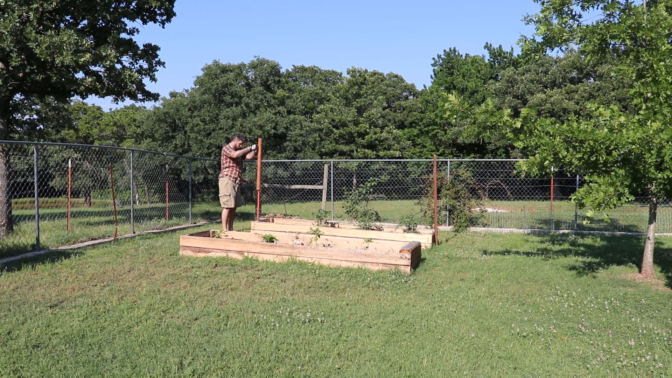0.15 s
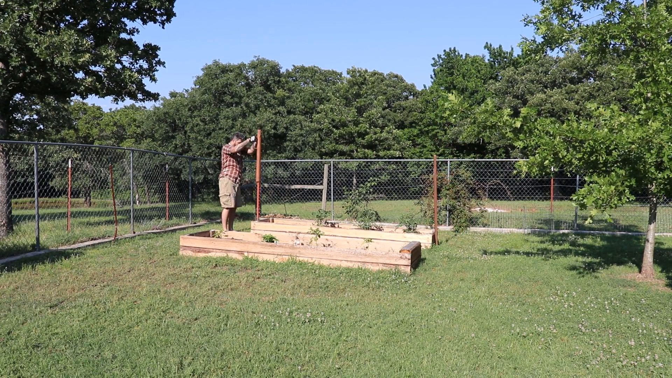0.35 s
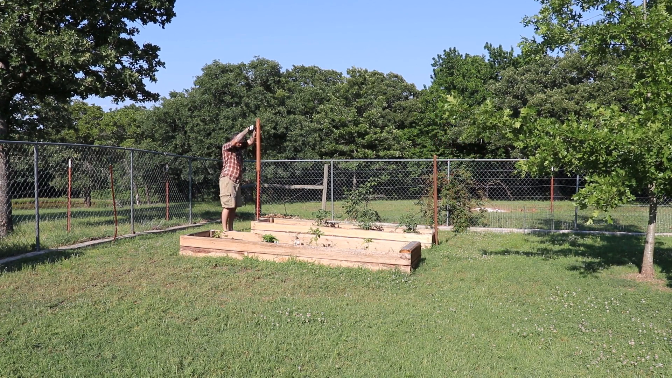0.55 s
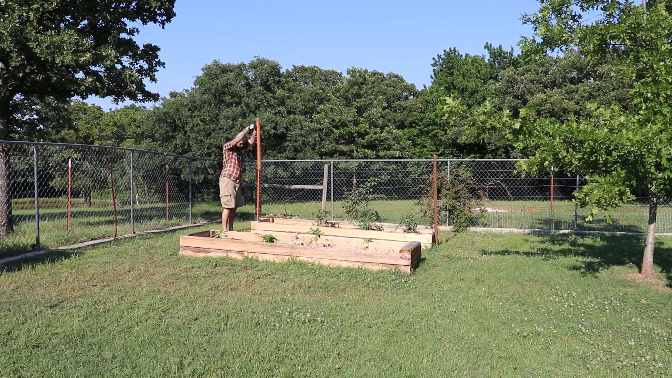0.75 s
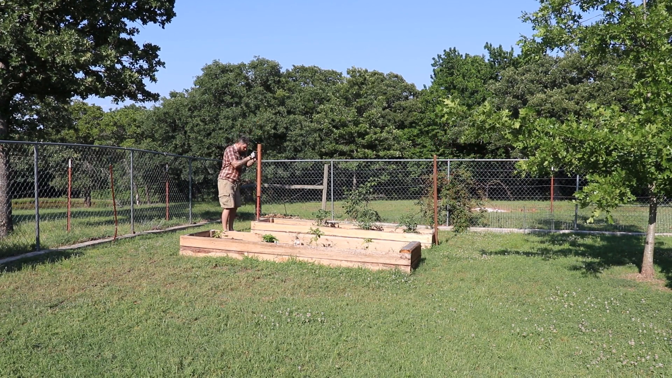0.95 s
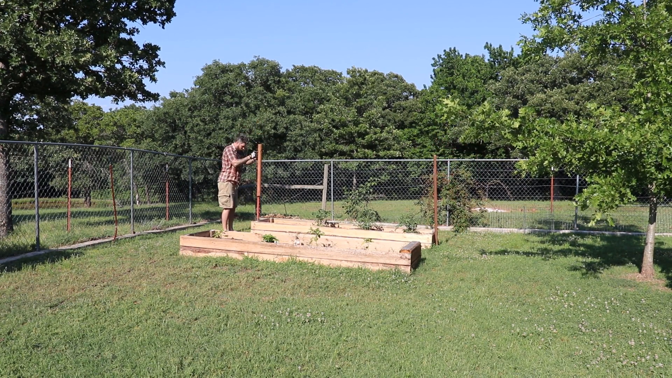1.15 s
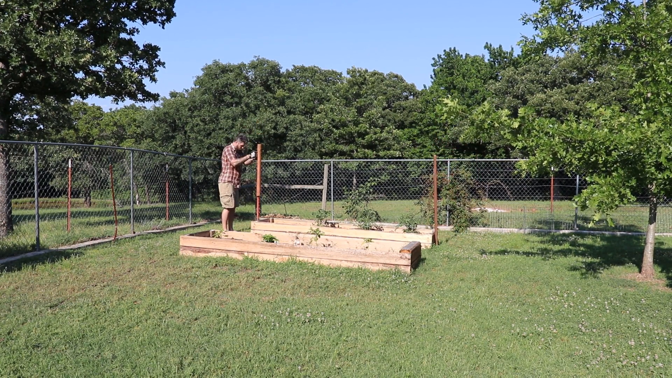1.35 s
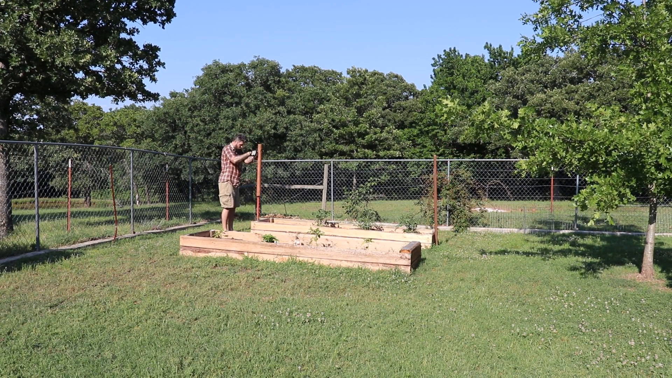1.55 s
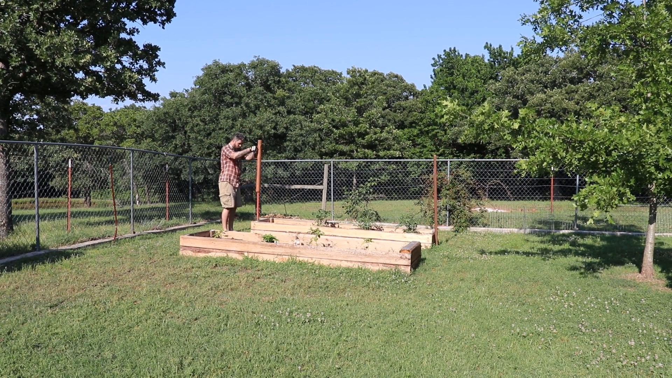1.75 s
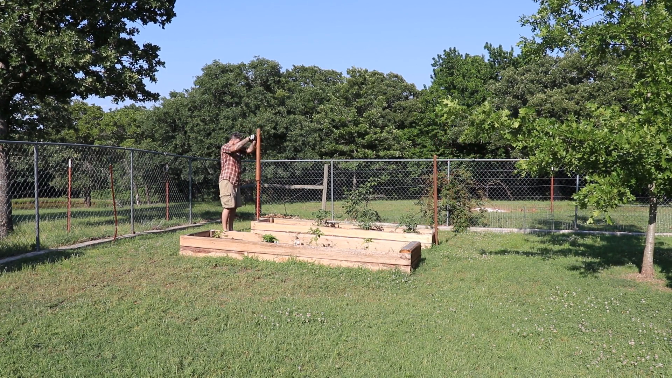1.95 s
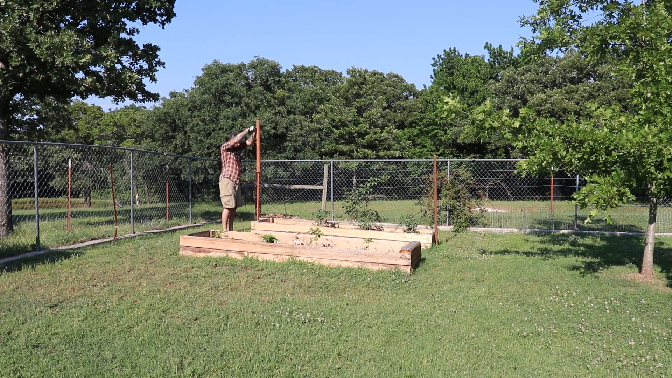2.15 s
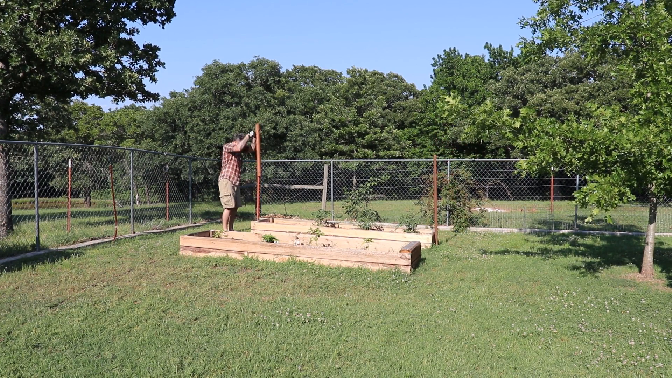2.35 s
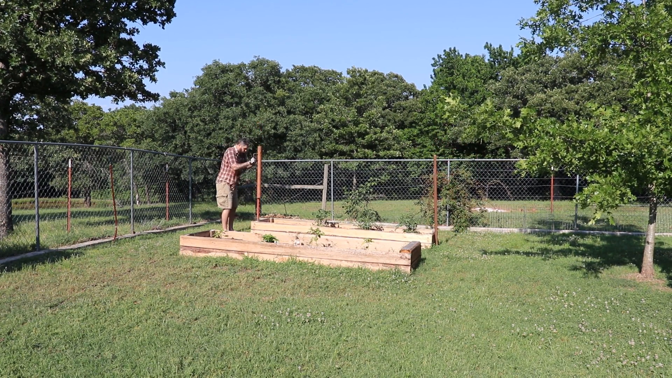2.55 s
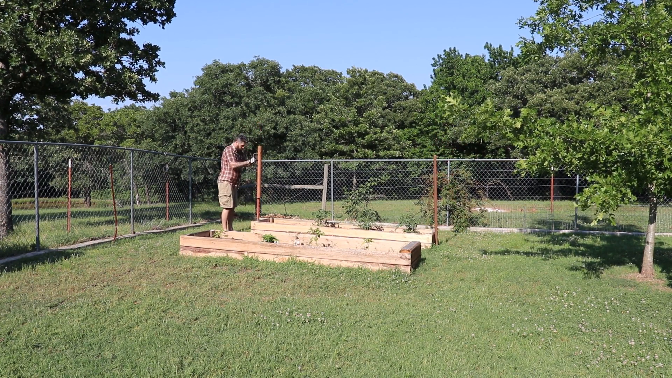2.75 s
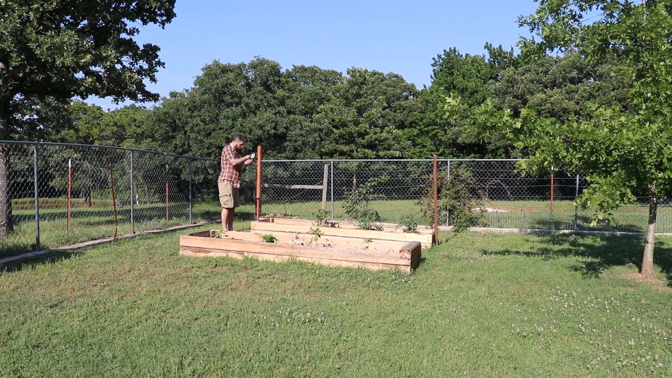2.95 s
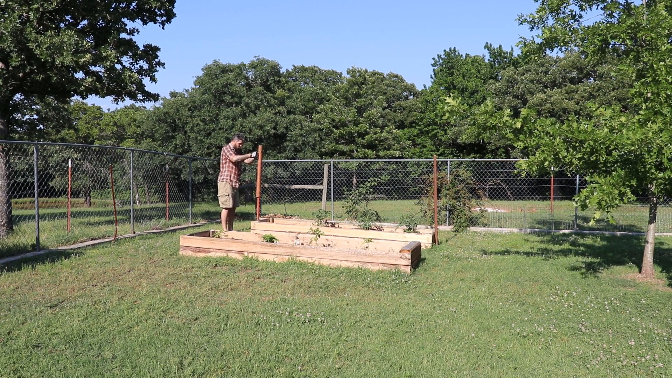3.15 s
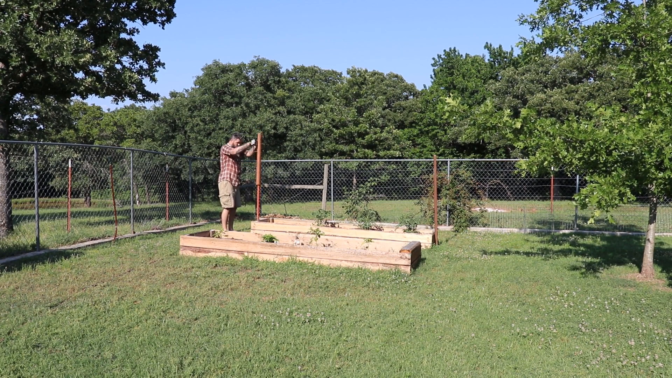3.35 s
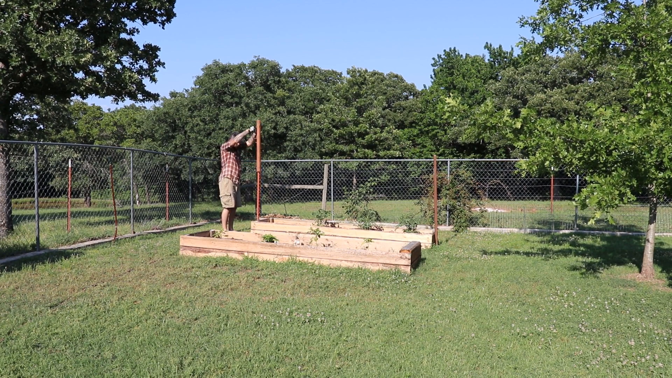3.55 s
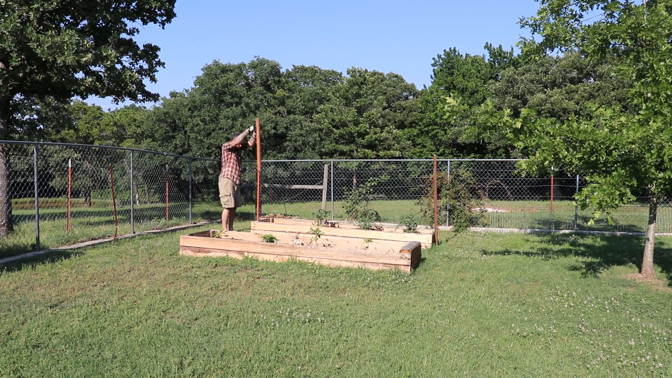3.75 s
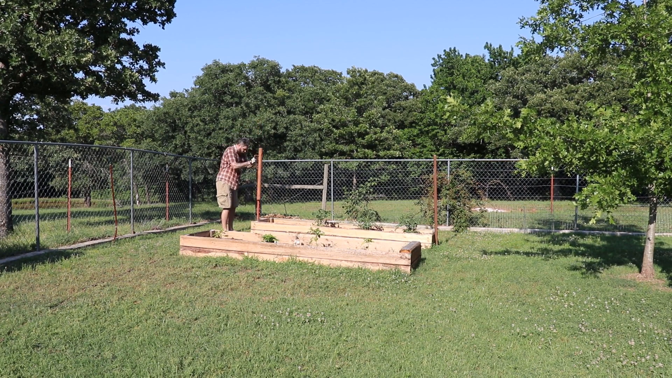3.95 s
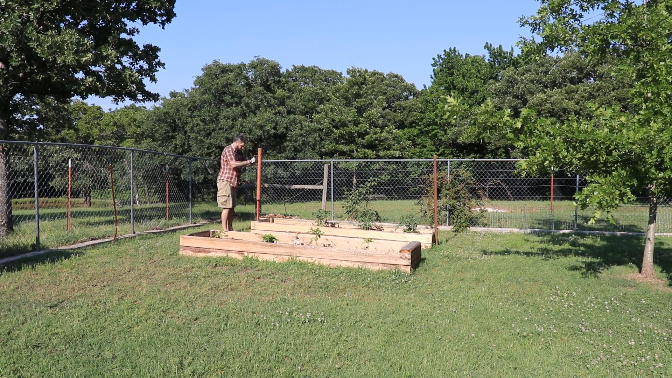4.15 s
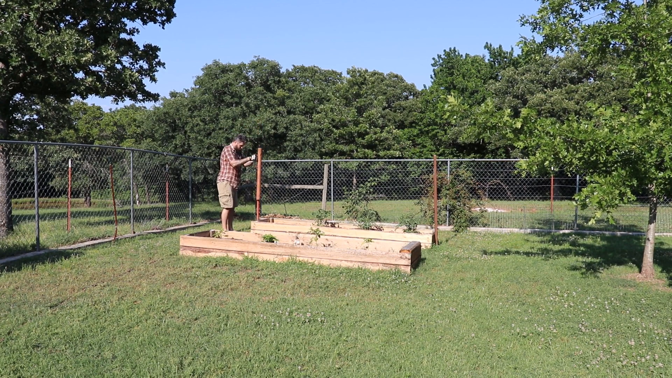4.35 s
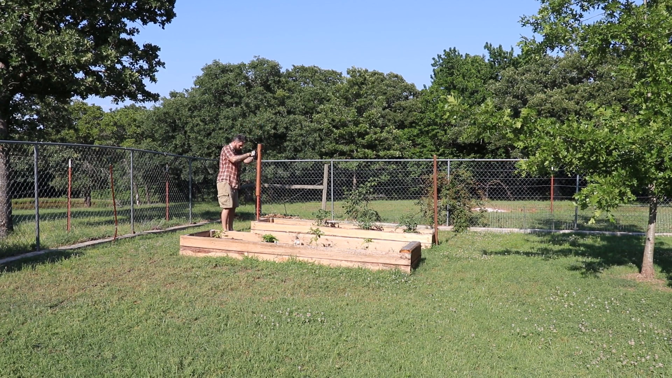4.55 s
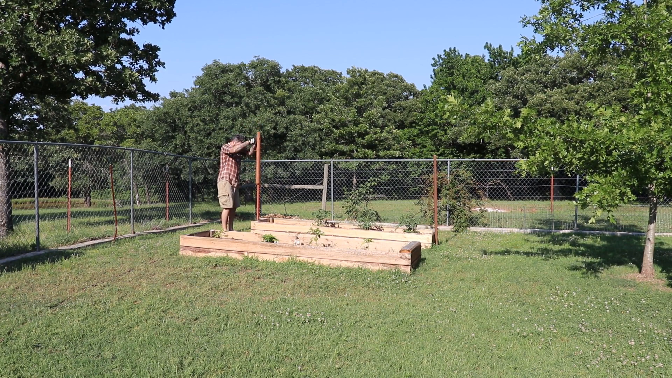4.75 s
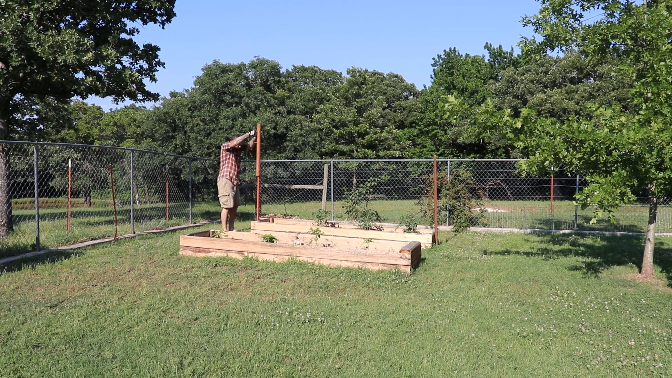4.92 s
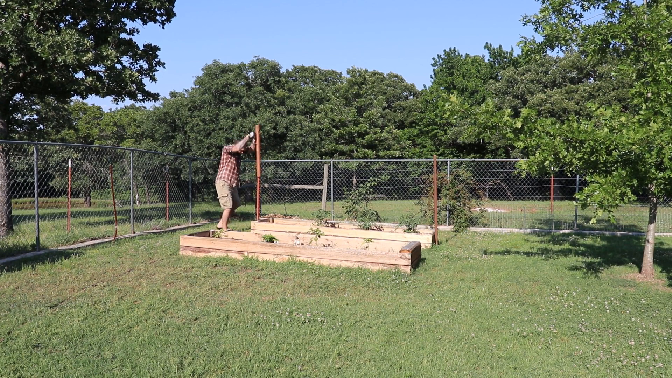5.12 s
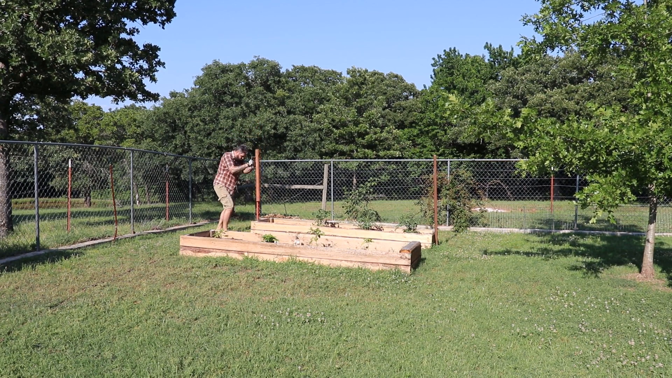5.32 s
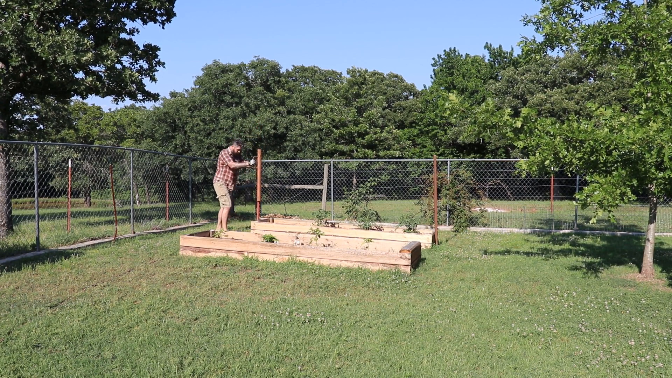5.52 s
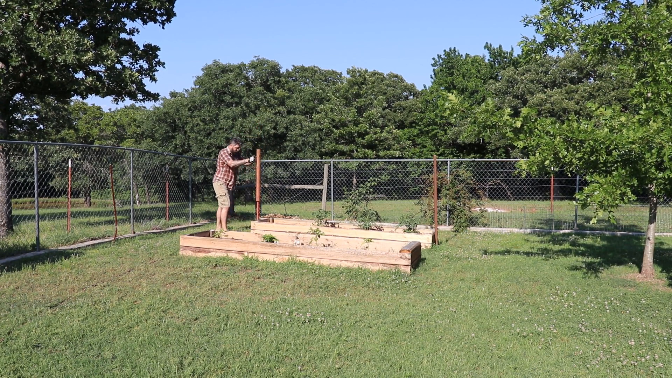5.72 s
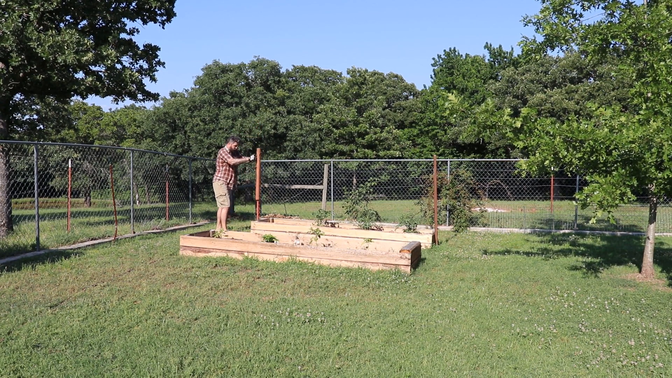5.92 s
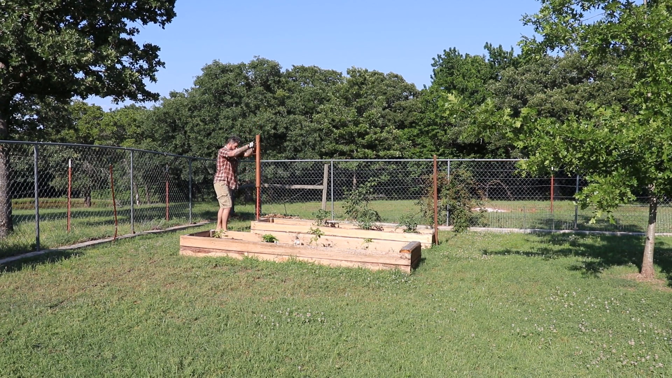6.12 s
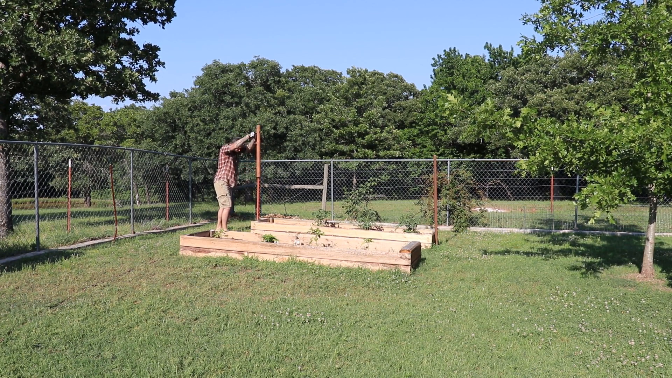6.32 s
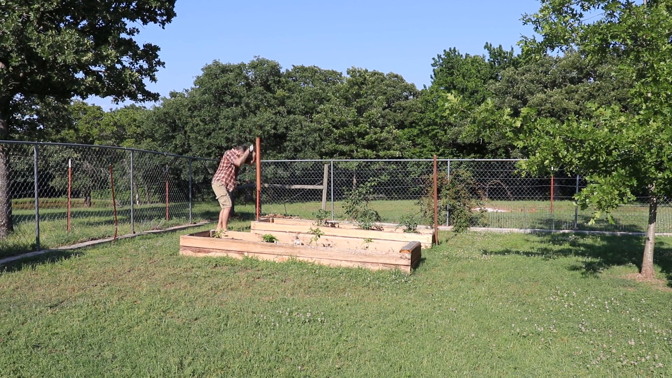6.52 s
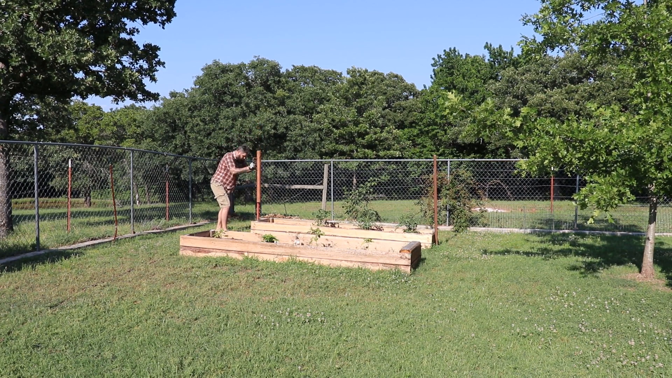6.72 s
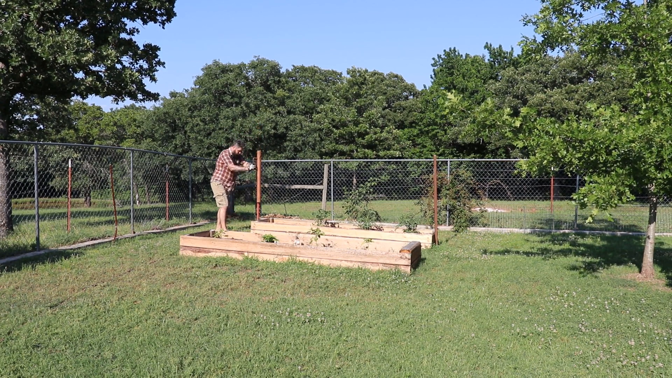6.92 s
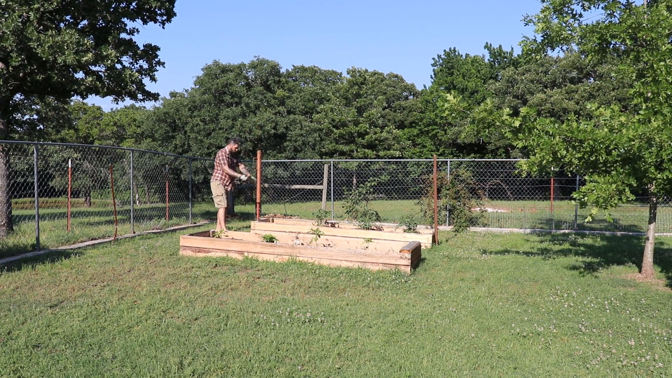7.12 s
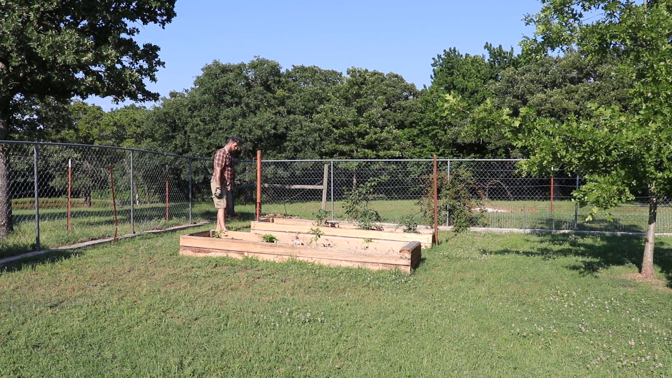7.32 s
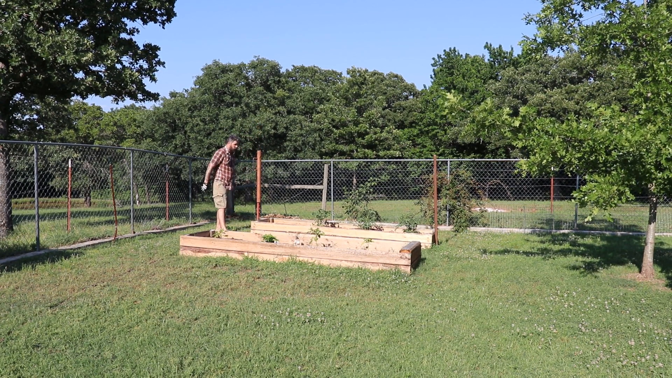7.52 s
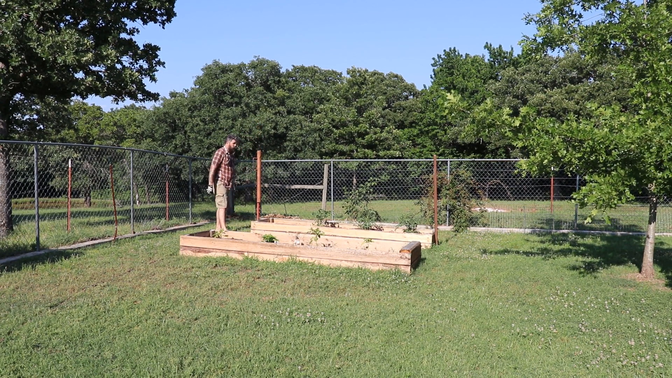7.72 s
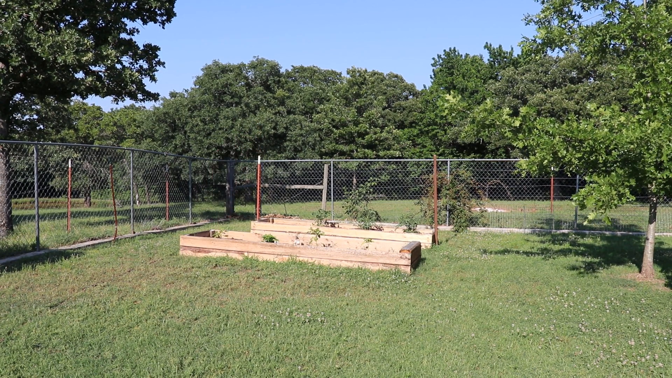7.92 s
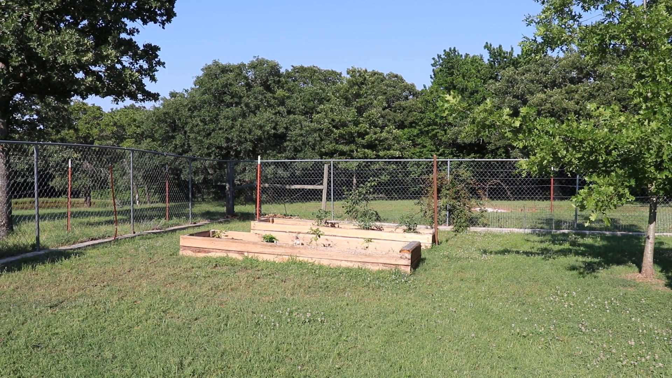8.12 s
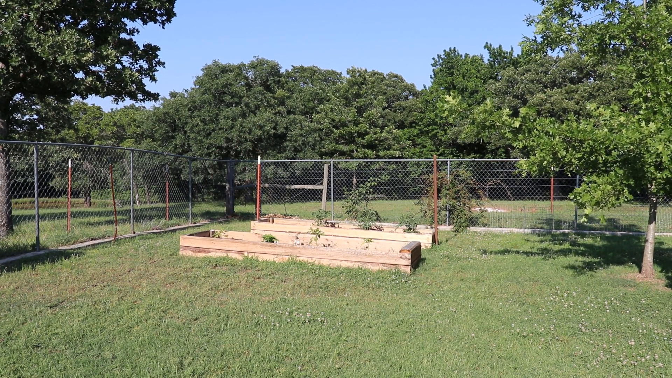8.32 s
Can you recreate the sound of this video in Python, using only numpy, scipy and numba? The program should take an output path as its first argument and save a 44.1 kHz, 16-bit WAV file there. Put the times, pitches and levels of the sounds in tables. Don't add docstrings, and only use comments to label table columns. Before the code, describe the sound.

A hollow steel tube scrapes up a metal fence post and slams down five times, clanging with tree echoes over wind and faint crickets.

```python
import sys
import numpy as np
from scipy import signal
from scipy.fft import rfft, irfft, next_fast_len
from scipy.io import wavfile
from scipy.ndimage import uniform_filter1d
from numba import njit

SR = 44100
rng = np.random.default_rng(int(sys.argv[2]) if len(sys.argv) > 2 else 0)


def wrap_up_sound(samples):
    columns = np.atleast_2d(samples).T
    tamed = np.clip(columns, -1, 1)
    steps = np.round(tamed * 32767).astype(np.int16)
    wavfile.write(sys.argv[1], SR, steps)


def volts_from_db(level):
    exponent = np.asarray(level, float) / 20
    return 10 ** exponent


N = 373518

SCENE_CHANGE_S = 7.942
BAND_EDGES_HZ = 75 * 2 ** np.arange(0, 8.1, .5)
BAND_CENTRES_HZ = np.sqrt(BAND_EDGES_HZ[:-1] * BAND_EDGES_HZ[1:])

# t/s, level/dB
GUSTS = [(0.0, -42), (0.6, -43.5), (1.0, -52), (1.58, -42), (2.05, -33.5), (2.4, -42), (2.75, -47),
         (3.0, -49.5), (3.45, -51), (3.56, -34.5), (3.75, -34.5), (4.0, -44), (4.7, -42.5), (5.0, -38.5),
         (5.6, -43), (6.1, -45), (7.7, -50.5), (8.47, -47)]
# f/Hz, density/dB
WIND_SPECTRUM = [(11, -26), (18, 7), (69, -5), (134, -14.5), (166, -21), (356, -36), (400, -35.5),
                 (520, -64.5), (880, -120)]
# f/Hz, density/dB
AIR_SPECTRUM = [(88, -41), (150, -5), (231, -8.5), (484, -10), (534, -14), (637, -8), (821, -13.5),
                (941, -13), (16000, -30)]
AIR_DB = -55.5
# t/s, length/s, level/dB
CHIRPS = [(0.128, 0.061, -52), (1.87, 0.061, -65), (3.71, .06, -66), (5.805, 0.019, -57), (6.35, .06, -66),
          (7.75, 0.0764, -58), (8.07, .055, -53.5)]

# first catch t/s, sliding free t/s, fastest t/s, top t/s, rub at fastest/dB
LIFTS = [
    (0.225, 0.345, 0.58, 0.88, -43.5),
    (1.685, 1.917, 2.06, 2.35, -40.5),
    (3.215, 3.41, 3.66, 3.6, -41),
    (4.495, 4.695, 4.85, 5.2, -40.5),
    (5.985, 5.99, 6.21, 6.14, -34.5),
]
CREEP_DB, LET_GO_DB, HALF_SLOWED_DB, STOPPED_DB = -55, -2.5, -17, -90
# start t/s, rub at start/dB, rub at blow/dB, tilt/(dB/octave)
DROPS = [
    (0.868, -28, -24, 2.5),
    (2.376, -28, -31, 1),
    (3.834, -28, -30.5, 1),
    (5.174, -33, -16, 3.5),
    (6.518, -23.5, -28, 4),
]
DROP_RISE_S, DROP_CLEAR_S = .008, .0061
# t/s, peak/dB, tilt/(dB/octave), low ring/dB, middle ring/dB
LOOSE_KNOCKS = [(0.214, -15.5, -4.5, -31.5, -32.5), (0.308, -26, -6, -37.5, -30.5),
                (0.358, -33, -11.5, -61.5, -50), (0.596, -44.5, 7.5, -26.5, -39),
                (1.676, -21, -6, -25, -36), (1.707, -18.5, -4.5, -37.5, -34.5),
                (1.909, -35, -14, -45, -37.5), (1.946, -30, -7, -30, -28), (3.204, -8.5, 2.5, -27, -36),
                (3.313, -26, -4, -40.5, -27.5), (3.357, -28, 4, -34.5, -48), (3.428, -42.5, 9, -31, -27.5),
                (3.575, -32, -15, -35, -21.5), (4.482, -18.5, -6.5, -41, -68),
                (4.564, -29.5, -6.5, -70, -75), (4.608, -33, -7, -39, -40), (4.738, -21, 1, -32.5, -36.5),
                (4.808, -112, 46, -33.5, -38), (5.578, -21.5, -3.5, -37, -46),
                (5.765, -18.5, -2.5, -79.5, -48), (5.905, -32.5, -6, -36.5, -40),
                (5.978, -8.5, -0.5, -28, -49), (6.24, -22.5, -1, -31, -34.5), (7.319, -22, -2, -37, -51)]
# t/s, peak/dB, tilt/(dB/octave), low ring/dB, middle ring/dB
DROP_KNOCKS = [(0.826, -31.5, 6.5, -46, -40.5), (0.863, -21.5, -3, -28, -32),
               (0.895, -18.5, 2, -31.5, -33.5), (0.946, -29, 11, -21, -33.5), (2.378, -23, -4, -48.5, -47),
               (2.463, -3.5, 3, -41, -15), (2.485, -8.5, 11, -30, -30), (3.846, -26, -7.5, -34.5, -31),
               (3.894, -5.5, -0.5, -25.5, -25.5), (3.952, -8, 5, -26, -25), (5.177, -6, 0, -39, -21),
               (5.246, -10, 0.5, -22.5, -23.5), (6.394, -35.5, -14, -29.5, -59.5), (6.47, -26, 3, -43, -46),
               (6.522, -27.5, -19, -39, -26.5)]
# t/s, peak/dB, echo/dB, low ring/dB, middle ring/dB
BLOWS = [
    (0.97, 1, -11.5, -27, -5.5),
    (2.494, 0.6, -8.5, -22, -10),
    (3.971, 1, -9, -44, -4.5),
    (5.283, 1.4, -8, -27, -3),
    (6.61, -0.5, -6, -40, -1),
]
# t/s, peak/dB
REBOUNDS = [
    (0.988, -2.5),
    (2.508, -8),
    (3.987, -26.5),
    (5.295, -20.5),
    (6.626, -22),
]
# from t/s, to t/s, pressure/(0-1)
SEATED = [
    (0.868, 1.67, 0.49),
    (2.367, 3.195, 0.41),
    (3.824, 4.473, 0.5),
    (5.205, 5.57, 0.48),
    (6.541, 7.273, 0.41),
]

# f/Hz, density/dB
RUB_SPECTRUM = [(150, -26.5), (420, -12.5), (700, -16), (1700, -6.5), (3000, -14), (4300, -10),
                (6200, -41.5), (7500, -16.5), (9600, -30), (12000, -44), (16000, -49.5)]
# f/Hz, density/dB
SLAM_SPECTRUM = [(47, -49), (80, -21), (768, -5), (1950, 3.5), (2970, -7.5), (3790, 3.5), (6030, -10.5),
                 (7360, -1.5), (10700, -14), (14000, -19), (16500, -24)]
KNOCK_T60_S, SLAM_T60_S = .09, .055
CHATTER_DB, CHATTER_T60_S = -24, .27
LIFT_TILT, CHATTER_TILT = 1.77, -5
LIFT_DRIVE_DB, DROP_DRIVE_DB, CHATTER_DRIVE_DB = 2, -5, -2
# loose/dB, pressed on/dB
LUMPS_DB = (2.0, 2.5)
MODE_LUCK_DB, MODE_WANDER_DB = 3.5, 3.0

# f/Hz, level/dB, t60/s
POST_MODES = [(406, -12, 0.17), (645, -21.5, 0.031), (912.5, -10, 0.11), (1171.4, -1.5, 0.21),
              (1208, -5.5, 0.24), (1527, -8.5, 0.08), (1716, -3.5, 0.08), (1956, -10.5, 0.26),
              (2009, -4, 0.21), (2080, -6, 0.12), (2340, -10, 0.11), (2429, -4, 0.097), (2853, -10.5, 0.16),
              (3195, -23, 0.12), (4066, 1, 0.054), (4410, -6.5, 0.09), (4756, -8, 0.088),
              (5310, -28.5, 0.92), (5740, -20, 0.1), (8900, -31, 0.14)]
# f/Hz, level/dB, t60/s
TUBE_RINGS = [
    [(1340, 0, 2.2), (1395, -11, .5), (1420, -14, .4)],
    [(3822, 0, .9), (3774, -14, .7), (3881, -14, .7)],
    [(7181, -1, .4), (7222, -8, .3), (7245, -7, .3), (7340, -9, .3), (11582, -13, .25), (11713, -11, .25)],
]
CONTACT_LOSS = (4.2, 2.1, 5.6, 0.77)
SLIDE_LOSS = (1.6, 0.82, 7.8)
HUSH_S, HUSH_LOSS = .008, 40
HIGH_RING_DB, HIGH_RING_PER_TILT, BLOW_HIGH_RING_DB = -20.5, 1.5, -2.5
RING_FLUTTER_DB = 2.5
# f/Hz, level/dB, t60/s
THUDS = [
    (130.5, -21.5, 0.1),
    (543, 0.5, 0.016),
    (614, -30, 0.27),
]
# t/s, f/Hz, level/dB, t60/s
PINGS = [(0.214, 406, -39, 0.6), (.495, 3195, -33.5, 0.18), (1.676, 406, -39, 0.38),
         (3.204, 5310, -27.5, 0.12), (3.204, 2853, -11, 0.023), (3.28, 2853, -34.5, 0.099),
         (3.355, 2853, -41, 0.16), (4.482, 420, -44, 0.2), (5.904, 3195, -35, 0.058),
         (6.03, 1343, -39, 5.3), (.47, 3822, -55, .5), (7.32, 912, -36, 0.31), (7.599, 2500, -60, 0.58)]

# f/Hz, level/dB, t60/s
TREES = [(199, -2, 0.61), (613, -8.5, 0.98), (1411, 3.5, 1), (3700, 1, 0.97), (7980, 6, 0.24),
         (14330, -2, 0.14)]
TREES_DELAY_S, TREES_RISE_S = .118, .018
FRONT_DB, FRONT_T60_S, NEAR_DB, NEAR_T60_S = 18.5, .18, 13.5, .69
TRUNKS_DB = 2.5
RING_ECHO_DB = -3

# t/s, hiss/dB, drumming over hiss/dB
SPRAY = [
    (8.243, -53, 2),
    (8.251, -51, -6.5),
    (8.387, -53, -3),
    (8.391, -51.5, -3),
    (8.47, -56.5, -5),
]
# f/Hz, density/dB
SPRAY_SPECTRUM = [(410, -42.5), (700, -26), (1090, -10.5), (1310, -19.5), (1500, -1.5), (3940, -6),
                  (5330, -7), (9110, -3), (16000, -16)]
# t/s, f/Hz, level/dB
PEEP = (8.395, 5400, -45)


def unit(x):
    return x / np.sqrt(np.mean(x ** 2) + 1e-20)


def at_hz(points, hz, column=1):
    points = np.array(points)
    return np.interp(np.log(hz), np.log(points[:, 0]), points[:, column])


def in_time(rows, column=1, outside=None):
    rows = np.array(rows)
    return np.interp(np.arange(N) / SR, rows[:, 0], rows[:, column], outside, outside)


def band(x, low_hz, high_hz):
    sos = signal.butter(2, [low_hz, min(high_hz, .45 * SR)], "band", fs=SR, output="sos")
    return signal.sosfilt(sos, x)


def coloured(spectrum):
    size = next_fast_len(N)
    hz = np.maximum(np.fft.rfftfreq(size, 1 / SR), 1)
    white = rfft(rng.standard_normal(N), size)
    return unit(irfft(white * volts_from_db(at_hz(spectrum, hz)), size)[:N])


def drift(rate_hz):
    return np.interp(np.arange(N) / SR * rate_hz, np.arange(4000), rng.standard_normal(4000))


def slow_amp(db):
    return np.repeat(volts_from_db(db), 32)[:N]


def clicks(times_s, db):
    out = np.full(N, 1e-18)
    out[(np.asarray(times_s) * SR).astype(int)] = volts_from_db(db)
    return out


def fall(t60_s):
    return volts_from_db(-60 / (max(t60_s, .005) * SR))


def decaying(hits, t60_s):
    return signal.lfilter([1], [1, -fall(t60_s)], hits)


def octaves_up(hz):
    return np.log2(max(hz, 1200) / 2800)


def wind():
    return volts_from_db(in_time(GUSTS) + 2.8 * drift(6.4)) * coloured(WIND_SPECTRUM)


def air():
    return volts_from_db(AIR_DB + .17 * drift(8.4)) * coloured(AIR_SPECTRUM)


def crickets():
    out = np.zeros(N)
    u = np.arange(220) / SR
    pulse = np.hanning(220) * np.sin(2 * np.pi * (7150 * u - 1.3e5 * u * u))
    for start_s, length_s, db in CHIRPS:
        for s in np.arange(start_s, start_s + length_s, .0078):
            i = int(s * SR)
            out[i:i + 220] += volts_from_db(db - 11.0 * (1.5 - (s - start_s) / length_s)) * pulse
    return out


def all_knocks():
    knock = np.array(LOOSE_KNOCKS + DROP_KNOCKS)
    high_ring_db = knock[:, 1] + HIGH_RING_DB + HIGH_RING_PER_TILT * knock[:, 2]
    return np.column_stack([knock, high_ring_db])


def pressure():
    out = np.zeros(N)
    for start_s, end_s, share in SEATED:
        out[int(start_s * SR):int(end_s * SR)] = max(share, 0)
    return out


def slide_controls():
    silent_db, edge_s = -110, .005
    lift = []
    for catch, free, fastest, top, db in LIFTS:
        lift += [(catch - edge_s, silent_db), (catch, CREEP_DB),
                 (max(free, catch + edge_s) - edge_s, CREEP_DB), (free, db + LET_GO_DB),
                 (fastest, db), ((fastest + top) / 2, db + HALF_SLOWED_DB),
                 (top, STOPPED_DB), (top + edge_s, silent_db)]
    drop = []
    for (s, start_db, end_db, tilt), blow in zip(DROPS, BLOWS):
        clear_s = blow[0] - DROP_CLEAR_S
        drop += [(s - edge_s, silent_db, tilt), (s, start_db - 11.5, tilt),
                 (s + DROP_RISE_S, start_db, tilt),
                 (clear_s, end_db, tilt), (clear_s + edge_s, silent_db, tilt)]
    knock = all_knocks()
    chatter = decaying(clicks(knock[:, 0], knock[:, 1] + CHATTER_DB), CHATTER_T60_S)
    power = np.array([volts_from_db(in_time(lift)), volts_from_db(in_time(drop)), chatter]) ** 2
    share = power / power.sum(axis=0)
    tilt = share[0] * LIFT_TILT + share[1] * in_time(drop, column=2) + share[2] * CHATTER_TILT
    tube_db = np.dot([LIFT_DRIVE_DB, DROP_DRIVE_DB, CHATTER_DRIVE_DB], share)
    return 10 * np.log10(power.sum(axis=0)), tilt, tube_db


@njit
def resonate(drive, cosine, loss, damping, q):
    wide, out = np.zeros(len(drive)), np.zeros(len(drive))
    for i in range(2, len(drive)):
        r = 1 - loss * damping[i]
        wide[i] = (1 - q * q) / 2 * (drive[i] - drive[i - 2]) + 2 * q * cosine * wide[i - 1] - q * q * wide[i - 2]
        out[i] = wide[i] + 2 * r * cosine * out[i - 1] - r * r * out[i - 2]
    return out


def ring(hits, rub, hz, t60_s, damping):
    r, w = fall(t60_s), 2 * np.pi * hz / SR
    drive = hits + rub * np.sqrt(2 * (1 - r * r))
    return resonate(drive * np.sin(w), np.cos(w), 1 - r, damping, fall(.012))


def add_tone(out, s, hz, db, t60_s):
    i = int(s * SR)
    u = np.arange(min(SR, N - i)) / SR
    envelope = volts_from_db(db - 60 * u / max(t60_s, .02)) * (1 - np.exp(-u / .002))
    out[i:i + len(u)] += envelope * np.sin(2 * np.pi * hz * u)


def broad_clatter(grains, rub_db, tilt, wander_db, firm):
    knock, blow, bounce = all_knocks(), np.array(BLOWS), np.array(REBOUNDS)
    slam_hits = clicks(blow[:, 0], blow[:, 1] - 7) + clicks(bounce[:, 0], bounce[:, 1] - 5)
    slams = decaying(slam_hits, SLAM_T60_S)
    out = np.zeros(N)
    for k, hz in enumerate(BAND_CENTRES_HZ):
        up = octaves_up(hz)
        noise = unit(band(grains[k % 2], BAND_EDGES_HZ[k], BAND_EDGES_HZ[k + 1])) * np.sqrt(hz / 2800)
        knocks = decaying(clicks(knock[:, 0], knock[:, 1] - 11 + up * knock[:, 2]), KNOCK_T60_S)
        sliding = slow_amp(rub_db + 2.0 + 1.5 * firm + up * tilt + 3.0 * np.roll(wander_db, 281 * k))
        rubbed = volts_from_db(at_hz(RUB_SPECTRUM, hz)) * (sliding + knocks)
        out += noise * (rubbed + volts_from_db(at_hz(SLAM_SPECTRUM, hz)) * slams)
    return out


def post_modes(grains, rub_db, tilt, wander_db, seated):
    knock, blow = all_knocks(), np.array(BLOWS)
    luck_db = rng.normal(0, MODE_LUCK_DB, (len(knock) + len(blow), len(POST_MODES)))
    damping = 1 + CONTACT_LOSS[3] * seated
    out = np.zeros(N)
    for k, (hz, db, t60_s) in enumerate(POST_MODES):
        up = octaves_up(hz)
        hits = clicks(knock[:, 0], knock[:, 1] + db - 21 + up * knock[:, 2] + luck_db[len(blow):, k])
        hits += clicks(blow[:, 0], blow[:, 1] + db - 14.5 + luck_db[:len(blow), k])
        mode_db = rub_db + db - 8.0 + up * tilt + MODE_WANDER_DB * np.roll(wander_db, 219 * k)
        rub = np.roll(grains[0], 999 * k) * slow_amp(mode_db)
        out += ring(hits, rub, hz, t60_s, damping)
    return out


def tube_rings(grains, rub_db, tube_db, wander_db, seated):
    knock, blow = all_knocks(), np.array(BLOWS)
    blow_rings_db = blow[:, 3], blow[:, 4], blow[:, 1] + BLOW_HIGH_RING_DB
    hushed = np.convolve(clicks(blow[:, 0] - HUSH_S, 0), np.ones(int(HUSH_S * SR)))[:N]
    touching = np.minimum(slow_amp(rub_db + 53.5), 1) * (seated == 0)
    out = np.zeros(N)
    for k, family in enumerate(TUBE_RINGS):
        damping = 1 + CONTACT_LOSS[k] * seated + SLIDE_LOSS[k] * touching + HUSH_LOSS * hushed
        rub = np.roll(grains[1], 555 * k) * slow_amp(rub_db + tube_db - .5)
        hits = clicks(knock[:, 0], knock[:, 3 + k] - 3) + clicks(blow[:, 0], blow_rings_db[k] - 3)
        for j, (hz, db, t60_s) in enumerate(family):
            flutter_db = RING_FLUTTER_DB * np.roll(wander_db, 407 * (3 * k + j))
            out += slow_amp(db + flutter_db) * ring(hits, rub, hz, t60_s, damping)
    return out


def thuds_and_pings():
    out = np.zeros(N)
    for hz, db, t60_s in THUDS:
        for blow in BLOWS:
            add_tone(out, blow[0], hz, blow[1] + db, t60_s)
    for s, hz, db, t60_s in PINGS:
        add_tone(out, s, hz, db, t60_s)
    return out


def steel():
    rub_db, tilt, tube_db = slide_controls()
    seated = pressure()
    grains = rng.standard_normal((2, N)) * volts_from_db(4.0 * drift(300) + 1.5 * drift(20))
    rub_db = rub_db + np.where(seated > 0, LUMPS_DB[1], LUMPS_DB[0]) * drift(60)
    wander_db = drift(22)[::32]
    rub_db, tilt, tube_db = rub_db[::32], tilt[::32], tube_db[::32]
    clatter = broad_clatter(grains, rub_db, tilt, wander_db, seated[::32])
    clatter += post_modes(grains, rub_db, tilt, wander_db, seated)
    clatter += thuds_and_pings()
    return clatter, tube_rings(grains, rub_db, tube_db, wander_db, seated)


def garden_echo(x):
    t = np.arange(SR) / SR
    late = np.maximum(t - TREES_DELAY_S, 0)
    near = volts_from_db(NEAR_DB - 60 * t / NEAR_T60_S)
    front = volts_from_db(FRONT_DB - 60 * late / FRONT_T60_S)
    trunks = volts_from_db(TRUNKS_DB * drift(45)[:SR])
    rise = 1 - np.exp(-(late / TREES_RISE_S) ** 2)
    white = rng.standard_normal((2, SR))
    response = np.zeros(SR)
    for k, hz in enumerate(BAND_CENTRES_HZ):
        wood = volts_from_db(-60 * late / at_hz(TREES, hz, column=2))
        shape = near + trunks * (wood + front) * rise
        scatter = band(white[k % 2], BAND_EDGES_HZ[k], BAND_EDGES_HZ[k + 1])
        response += volts_from_db(at_hz(TREES, hz)) * shape * scatter
    return signal.fftconvolve(x, response / np.sqrt(np.sum(response ** 2)))[:N]


def spray():
    hiss_db = in_time(SPRAY, outside=-120)
    drops = unit(band(rng.standard_normal(N), 120, 260))
    drumming = volts_from_db(in_time(SPRAY, column=2) + 2.4 * drift(30)) * drops
    return volts_from_db(hiss_db + 1.8 * drift(37)) * (coloured(SPRAY_SPECTRUM) + drumming)


def bird():
    s, hz, db = PEEP
    t = np.arange(N) / SR
    return volts_from_db(db) * np.exp(-((t - s) / .0037) ** 2) * np.sin(2 * np.pi * hz * t)


def scene():
    clatter, rings = steel()
    echo_db = np.where(pressure() > 0, in_time(BLOWS, column=2), -15)
    echo = garden_echo(volts_from_db(echo_db) * (clatter + volts_from_db(RING_ECHO_DB) * rings))
    metal = clatter + rings + echo
    to_change_s = np.arange(N) / SR - SCENE_CHANGE_S
    splice = 1 - .7 * np.exp(-(to_change_s / .004) ** 2)
    rest = wind() + air() + crickets() + spray() + bird()
    return ((metal * (to_change_s < 0) + rest) * splice)[None]


def band_limit(x):
    return signal.sosfilt(signal.butter(12, 16630, fs=SR, output="sos"), x)


def record(dry):
    level_db = 10 * np.log10(uniform_filter1d(dry[0] ** 2, 256) + 1e-12)
    duck_db = 1.077 * np.maximum(level_db + 18.0, 0)
    release_db = 75 * np.arange(N) / SR
    held_db = np.maximum.accumulate(duck_db + release_db) - release_db
    r = np.exp(-1 / (.027 * SR))
    x = dry * volts_from_db(-signal.lfilter([1 - r], [1, -r], held_db))
    rounded = .66 * np.tanh(x / .66)
    lowpass = signal.cheby2(12, 60, 16700, fs=SR, output="sos")
    return band_limit(signal.sosfilt(lowpass, rounded))


dry = scene()
out = record(dry)
wrap_up_sound(out)
```